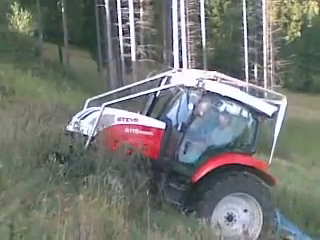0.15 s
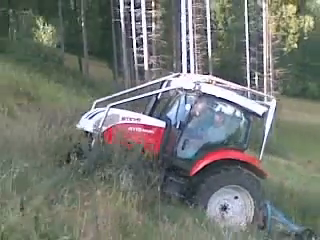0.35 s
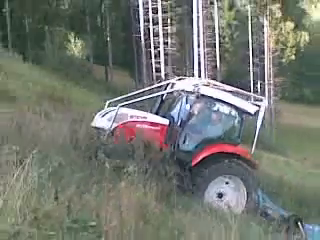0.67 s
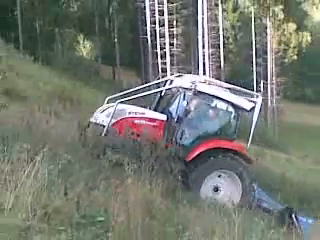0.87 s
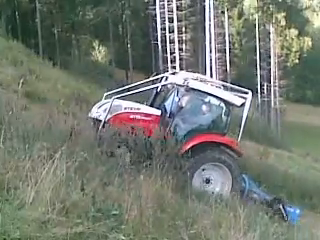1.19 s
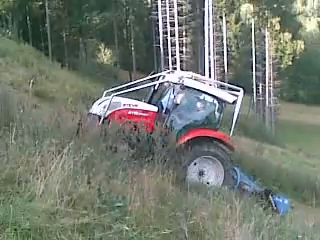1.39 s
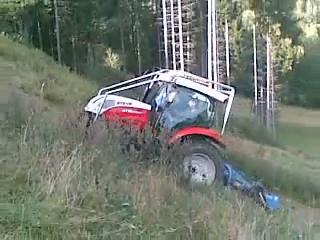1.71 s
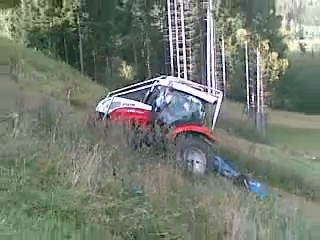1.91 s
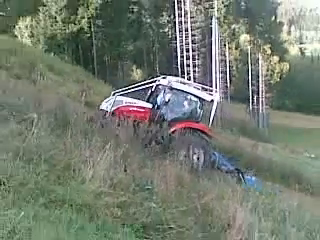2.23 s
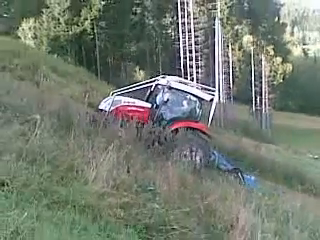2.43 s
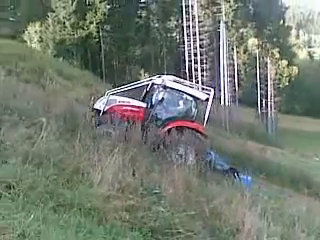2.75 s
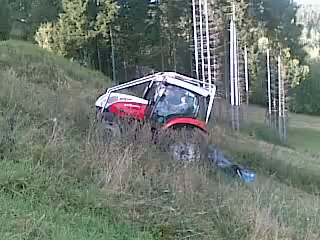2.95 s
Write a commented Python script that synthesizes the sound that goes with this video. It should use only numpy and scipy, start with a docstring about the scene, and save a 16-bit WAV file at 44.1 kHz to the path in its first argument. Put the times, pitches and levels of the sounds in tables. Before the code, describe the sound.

A diesel tractor drones steadily some way off, pulling a mulcher through tall grass.

```python
"""From the start, a four-cylinder diesel tractor pulls a mulcher through tall hillside grass, some way off.
The exhaust thuds once per firing, the engine block clatters, the shafts hum and the flails hiss in the grass.
Between 0.5 and 1.8 s, three dull knocks take turns with two sharp ticks close to the microphone.
Meanwhile the exhaust starts to growl more as the flails bite, and the engine slows a little under the load.
It is slowest at about 2.5 s and is back up to speed by the end."""
import sys
import numpy as np
from scipy import signal
from scipy.fft import rfft, irfft
from scipy.io import wavfile

SR = 44100
rng = np.random.default_rng(int(sys.argv[2]) if len(sys.argv) > 2 else 0)


def int16_out(signal):
    """Quantize to a 16-bit WAV file."""
    q = np.round(np.clip(np.atleast_2d(signal).T, -1, 1) * 32767)
    wavfile.write(sys.argv[1], SR, q.astype(np.int16))


N = 138915
T = np.arange(N) / SR
CYLINDERS, FIRST_FIRING_S = 4, .0124

# how often the engine fires (t/s, f/Hz); "sag" below is how far this rate falls under its average
FIRING_RATE = [(0.0, 49.28), (0.5, 49.15), (1.1, 49.23), (1.45, 48.72), (1.7, 48.92), (2.2, 48.0),
               (2.45, 47.83), (2.75, 48.14), (3.0, 48.95), (3.15, 49.46)]
# tones that make up the thud (multiple of the firing rate, level/dB, change with sag/dB per Hz)
THUD_TONES = [(1, -35.5, 0.5), (2, -29.5, -.5), (3, -35, 1.9), (4, -45, -2.5), (5, -50, -1.5),
              (6, -51.5, -2), (7, -54, 0), (8, -46.5, 1.3), (9, -55, 3), (10, -53, -1)]
# tone colour of the burbling gas (f/Hz, relative level/dB)
BURBLE_SPECTRUM = [(12, -17), (60, -5.5), (110, -3.5), (180, -1), (260, -1.5), (350, -3), (460, -4),
                   (520, -6), (600, -20.5), (750, -62)]
# the exhaust pipe's growl, growing as the flails bite (t/s, level/dB)
GROWL_LEVEL = [(0, -46), (.9, -46), (1.5, -41.5), (2.3, -42), (3.15, -39.8)]

# tone colour of the engine block's clatter (f/Hz, relative level/dB)
CLATTER_SPECTRUM = [(450, -40), (650, -17), (820, -7), (1020, -4.5), (1280, 0), (1540, -1.5), (1850, -11.5),
                    (2200, -14), (2800, -26), (3500, -45)]
# loudness of the clatter (t/s, level/dB)
CLATTER_LEVEL = [(0, -38), (.9, -36.5), (2.2, -36.5), (3.15, -35.5)]
# ringing of the block and its steel parts (f/Hz, width/Hz, level/dB, change with sag/dB per Hz)
STEEL_RINGS = [(1292, 185, -49, 0.5), (2216, 490, -52, 2.5), (3730, 556, -55.5, 0.7), (4784, 410, -65, 2)]
# hums and whines of shafts, gears and rotor, plus one tone (2.25 times the firing rate) from the cylinders
# firing unevenly (multiple of the firing rate, level/dB, waver/cycles)
HUM_TONES = [(1.126, -52.5, .03), (2.25, -49, 0.07), (3.447, -46.5, 0.037), (17.1, -56.5, 0.088),
             (20.5, -55.5, 0.071), (21.97, -55, 0.1), (25.97, -48.5, 0.13), (26.6, -54, 0.18),
             (30.37, -49, 0.13)]

# tone colour of the flails in the grass (f/Hz, relative level/dB)
HISS_SPECTRUM = [(1500, -10), (2800, 2), (5300, -1), (6300, 2.5), (7100, 0.5), (9400, -1.5), (10300, -10.5),
                 (11200, -3.5), (13500, -11), (15800, -13)]
# loudness of the hiss (t/s, level/dB)
HISS_LEVEL = [(0, -57.5), (.5, -60), (1.75, -60), (1.85, -58.5), (2.2, -58), (2.52, -56.5), (2.63, -56.5),
              (2.69, -55.5), (2.75, -58), (3.15, -58)]

# dull knocks (t/s, ring level/dB, crack level/dB)
KNOCKS = [(.4802, -27, -36), (1.0903, -30, -43), (1.8313, -27.5, -40)]
# tones a knock rings with (f/Hz, relative level/dB, time to fade by 60 dB/s)
KNOCK_TONES = [(690, 2, 0.012), (3200, -14, .008)]
# tone colour of a knock's crack (f/Hz, relative level/dB)
KNOCK_SPECTRUM = [(800, 0), (3500, -2), (6000, -21), (12000, -26)]

# sharp ticks (t/s, ring level/dB, crack level/dB)
TICKS = [(.8597, -25, -29), (1.3868, -33, -34)]
# tones a tick rings with (f/Hz, relative level/dB, time to fade by 60 dB/s)
TICK_TONES = [(3200, -1, 0.0057), (2800, -29, .025), (3760, -18, 0.02), (760, -2, 0.016)]
# tone colour of a tick's crack (f/Hz, relative level/dB)
TICK_SPECTRUM = [(2300, 1), (3500, 6.5), (5200, -8.5), (7500, -7.5), (10000, -10.5), (15500, -17)]


def amp(db):
    """Turns decibels into a number to multiply by."""
    return 10 ** (np.asarray(db) / 20)


def unit(x):
    """Scales a signal so that its average strength (rms) is 1."""
    return x / np.sqrt(np.mean(x ** 2) + 1e-20)


def curve(points):
    """Joins (time, value) points with straight lines, giving a value for every sample."""
    return np.interp(T, *np.transpose(points))


def colour(x, spectrum):
    """Gives x a tone colour that fades away beyond both ends of the table; strength 1."""
    hz = np.fft.rfftfreq(len(x), 1 / SR) + 1
    table_hz, table_db = np.transpose(spectrum)
    gain = amp(np.interp(np.log(hz), np.log(table_hz), table_db))
    edges = np.minimum(hz / table_hz[0], 1) ** 3 * np.minimum(table_hz[-1] / hz, 1) ** 3
    return unit(irfft(rfft(x) * gain * edges, len(x)))


def resonate(x, hz, width_hz):
    """Makes x ring by keeping only what lies near one frequency; strength 1."""
    distance = (np.fft.rfftfreq(N, 1 / SR) - hz) / width_hz
    return unit(irfft(rfft(x) / (1 + 1j * distance) ** 4, N))


def drift(rate_hz):
    """Random wandering, mostly slower than rate_hz; strength 1."""
    hz = np.fft.rfftfreq(N, 1 / SR)
    return unit(irfft(rfft(rng.standard_normal(N)) / (1 + (hz / rate_hz) ** 4), N))


def bursts(firings, repeat, lag, swing_db, uneven_db):
    """Noise that swells once per firing; a share of it repeats, as each cylinder has its own sound."""
    size = 3600  # samples in the pattern for one round of all cylinders
    pattern = irfft(np.exp(2j * np.pi * rng.random(size // 2 + 1)))
    looped = unit(np.interp(firings / CYLINDERS, np.arange(size) / size, pattern, period=1))
    noise = np.sqrt(repeat) * looped + np.sqrt(1 - repeat) * rng.standard_normal(N)
    swell_db = swing_db * np.cos(2 * np.pi * (firings - lag))  # lag is a fraction of one firing
    return noise * amp(swell_db + uneven_db * drift(34))


def exhaust(firings, sag_hz, jitter_cycles=.0048, burble_db=-38.5):
    """Each firing is a steep swing of pressure, with burbling gas and a growl from the ringing pipe."""
    phase = 2 * np.pi * (firings + jitter_cycles * drift(10))
    thud = sum(amp(db + per_hz * sag_hz) * np.sin(multiple * phase) for multiple, db, per_hz in THUD_TONES)
    gas = bursts(firings, repeat=.21, lag=.03, swing_db=1, uneven_db=1.3)
    burble = colour(gas, BURBLE_SPECTRUM) * amp(burble_db)
    puffs = bursts(firings, repeat=.42, lag=-.18, swing_db=2.5, uneven_db=.5)
    growl = resonate(puffs, hz=441, width_hz=117) * amp(curve(GROWL_LEVEL))
    wobble = 1 + .025 * drift(13)
    return np.sqrt(2) * thud * wobble + burble + growl  # sqrt(2) brings a sine to strength 1


def engine_block(firings, sag_hz):
    """Burning fuel shakes the block and makes its small parts ring."""
    shaking = bursts(firings, repeat=.45, lag=.14, swing_db=1.14, uneven_db=.5)
    clatter = colour(shaking, CLATTER_SPECTRUM) * amp(curve(CLATTER_LEVEL))
    rattle = bursts(firings, repeat=.28, lag=.14, swing_db=.3, uneven_db=.93)
    rings = sum(amp(db + per_hz * sag_hz) * resonate(rattle, hz, width_hz)
                for hz, width_hz, db, per_hz in STEEL_RINGS)
    return clatter + rings


def drive_line(firings):
    """Shafts, gears and rotor hum in step with the engine, joined by one tone from the unevenly firing
    cylinders; each tone wavers a little."""
    return np.sqrt(2) * sum(amp(db) * np.sin(2 * np.pi * (multiple * firings + waver * drift(4.1)))
                            for multiple, db, waver in HUM_TONES)


def mulcher(shreds_per_s=450, spread_db=7, clumps_db=.5):
    """The flails (swinging blades) hiss through clumps of grass and shred stalks with tiny clicks."""
    sizes = amp(spread_db * np.minimum(rng.exponential(1, N), 4))  # many small, a few big
    signs = rng.choice([-1, 1], N)
    hits = rng.random(N) < shreds_per_s / SR
    shreds = unit(sizes * signs * hits) * amp(-12)  # 12 dB below the smooth noise
    hiss = colour(rng.standard_normal(N) + shreds, HISS_SPECTRUM)
    return hiss * amp(curve(HISS_LEVEL) + clumps_db * drift(18))


def taps(events, tones, spectrum, crack_s, tail_db, tail_s):
    """Small blows, heard as knocks or ticks: a brief crack with a faint tail, and a quickly dying ring."""
    out = np.zeros(N)
    t = np.arange(SR // 20) / SR
    ring = sum(amp(db - 60 * t / fade_s) * np.sin(2 * np.pi * hz * t) for hz, db, fade_s in tones)
    fade = np.exp(-t / crack_s) + amp(tail_db) * np.exp(-t / tail_s)
    for start_s, ring_db, crack_db in events:
        crack = fade * colour(rng.standard_normal(len(t)), spectrum)
        start = round(start_s * SR)
        out[start:start + len(t)] += amp(ring_db) * ring + amp(crack_db) * crack
    return out


def scene():
    """One engine speed drives exhaust, block and drive line; the hiss, knocks and ticks join them."""
    rate_hz = curve(FIRING_RATE)
    firings = np.cumsum(rate_hz) / SR - FIRST_FIRING_S * rate_hz[0]  # running count of firings
    sag_hz = rate_hz.mean() - rate_hz
    tractor = exhaust(firings, sag_hz) + engine_block(firings, sag_hz) + drive_line(firings)
    grass = mulcher()
    knocks = taps(KNOCKS, KNOCK_TONES, KNOCK_SPECTRUM, crack_s=.00054, tail_db=-11, tail_s=.0087)
    ticks = taps(TICKS, TICK_TONES, TICK_SPECTRUM, crack_s=.00047, tail_db=-16, tail_s=.013)
    return (tractor + grass + knocks + ticks)[None]


def record(dry, cutoff_hz=15800):
    """Takes away the very highest treble."""
    low_pass = signal.firwin(511, cutoff_hz, window=("kaiser", 9), fs=SR)
    return signal.oaconvolve(dry, low_pass[None], "same")


dry = scene()
out = record(dry)
int16_out(out)
```